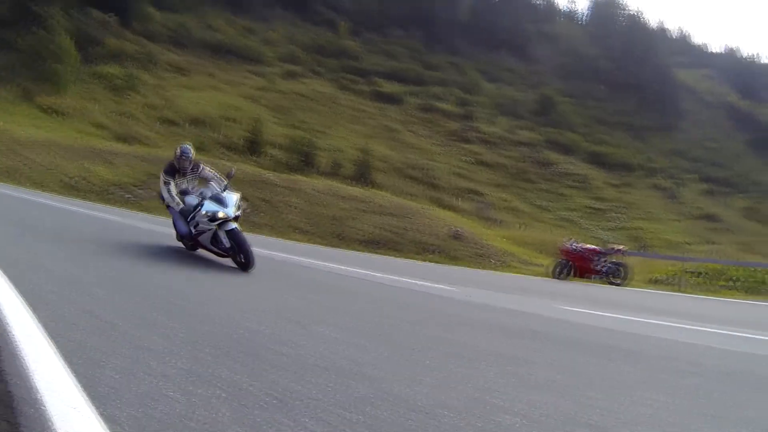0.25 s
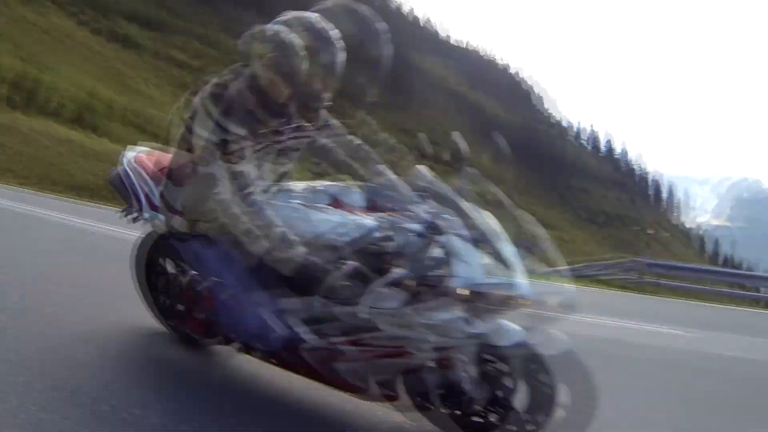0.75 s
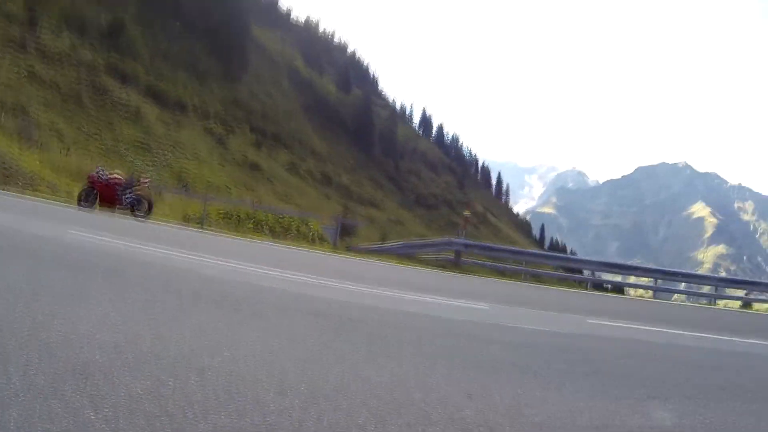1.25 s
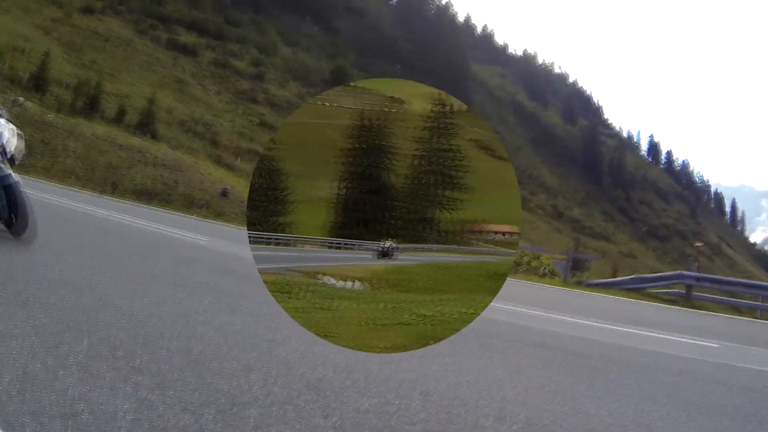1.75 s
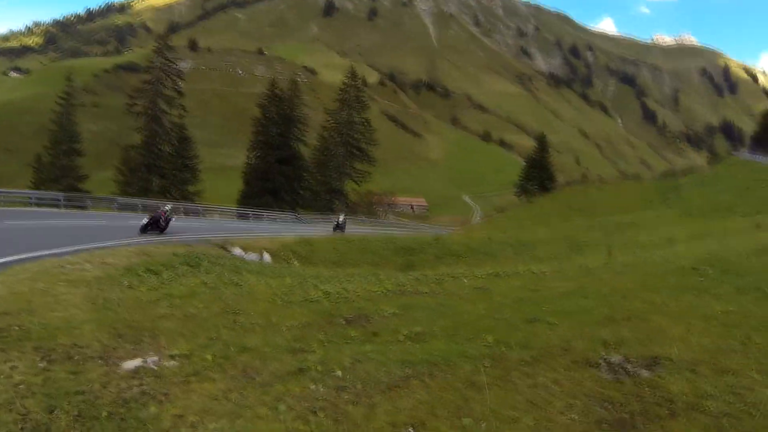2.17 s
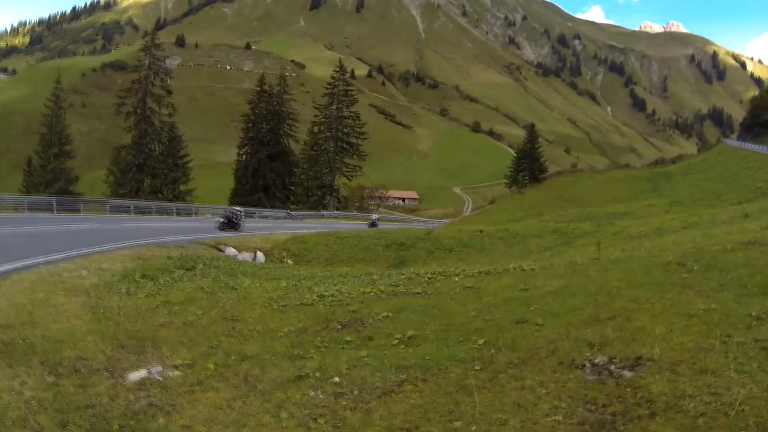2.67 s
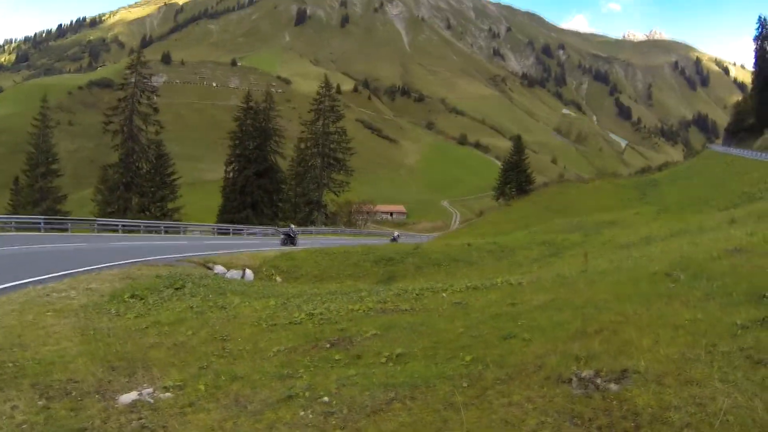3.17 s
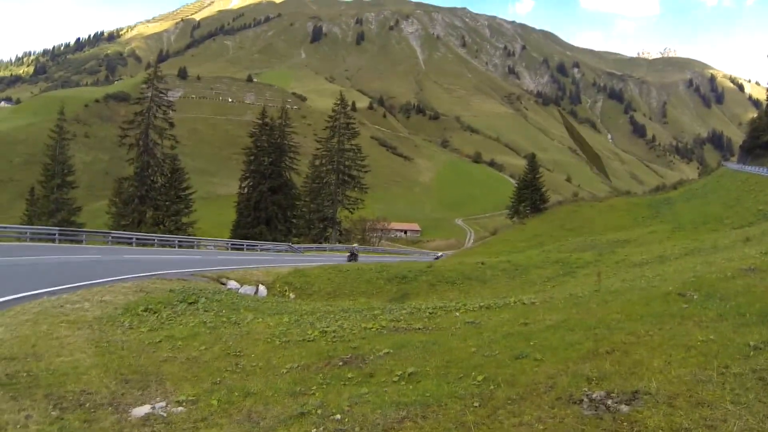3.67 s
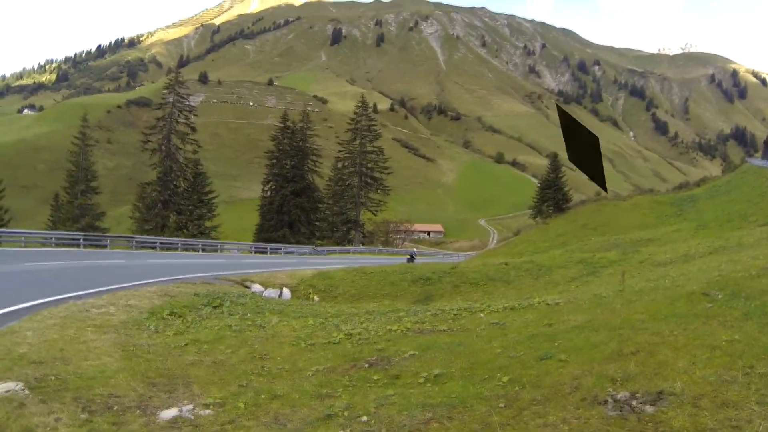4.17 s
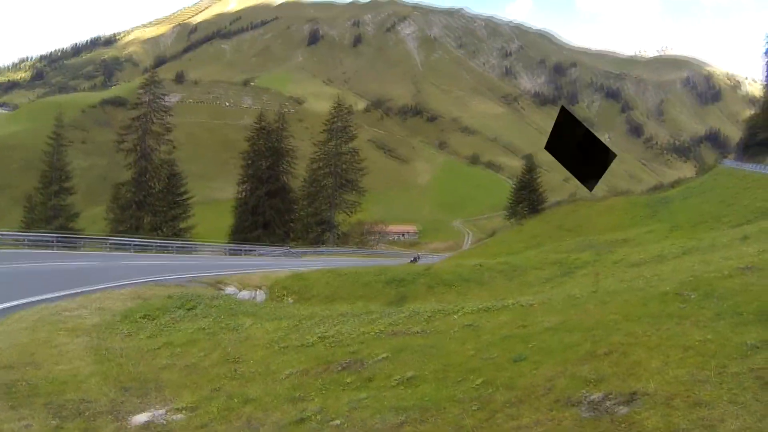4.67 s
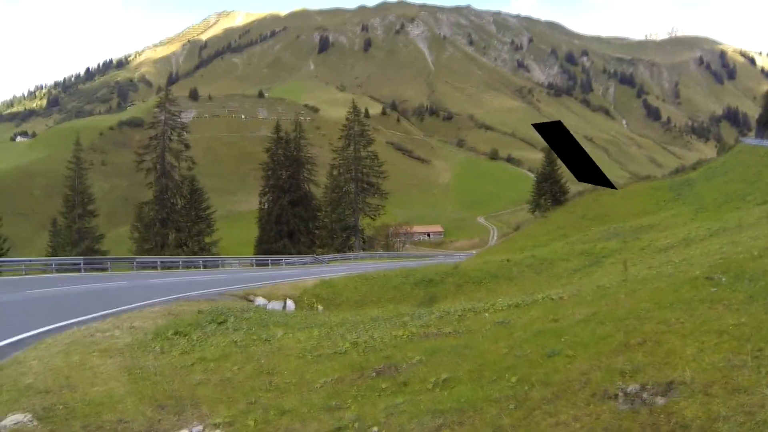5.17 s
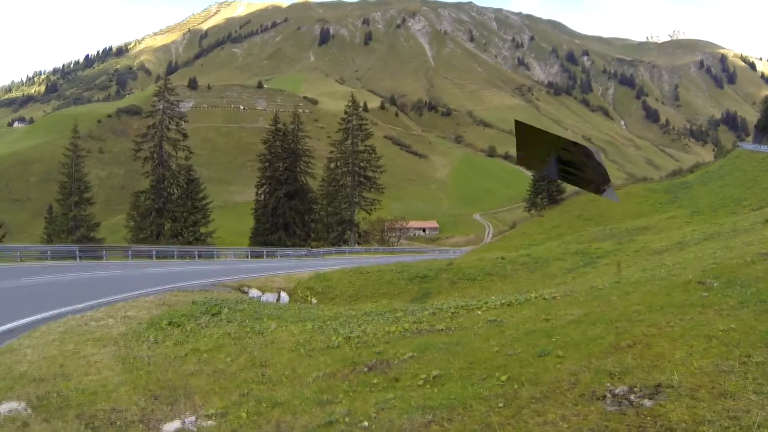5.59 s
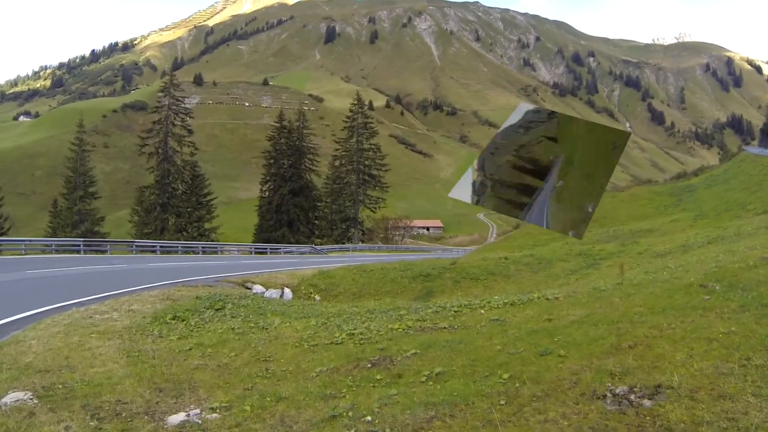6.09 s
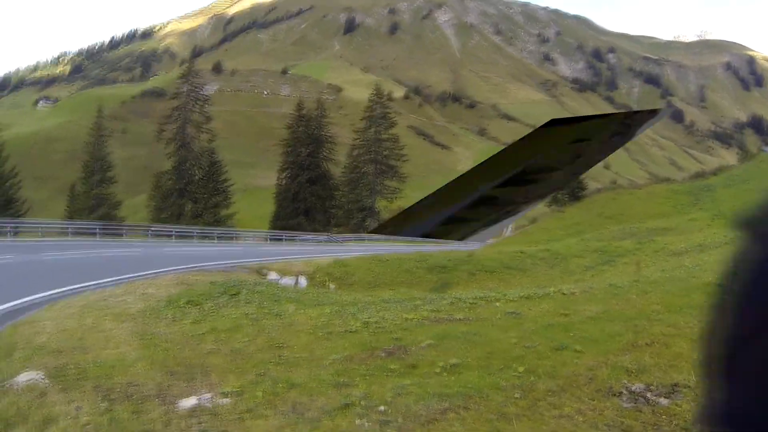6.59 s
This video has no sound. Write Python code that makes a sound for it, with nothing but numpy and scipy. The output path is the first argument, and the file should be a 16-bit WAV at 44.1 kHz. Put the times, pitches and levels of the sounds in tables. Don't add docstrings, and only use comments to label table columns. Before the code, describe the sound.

Outdoor mountain road, microphone muffled inside a small hard case. Low wind buffets throughout. A throbbing motorcycle passes within the first second, with tyre and intake roar; after a cut, a smoother engine climbs in pitch and fades. Then handling dominates: sharp plastic snaps, dull knocks, short scraping rubs and a squeaky rasp, over a barely audible idling engine.

```python
import sys
import numpy as np
from scipy import signal
from scipy.fft import rfft, irfft
from scipy.io import wavfile
from scipy.ndimage import uniform_filter1d

SR = 44100
rng = np.random.default_rng(int(sys.argv[2]) if len(sys.argv) > 2 else 0)


def convert_level_to_amplitude(level_db):
    exponent = np.asarray(level_db, float) / 20
    return 10 ** exponent


def transcribe(signal):
    frames = np.atleast_2d(signal).T
    limited = np.clip(frames, -1, 1)
    pcm = np.round(limited * 32767).astype(np.int16)
    wavfile.write(sys.argv[1], SR, pcm)


N = 301644
T = np.arange(N) / SR
SCENE_CHANGE_S = 1.967


def evened(x):
    return x / np.sqrt(np.mean(x ** 2) + 1e-20)


def add(mix, start_s, sound):
    part = mix[round(start_s * SR):][:len(sound)]
    part += sound[:len(part)]


def columns(rows):
    s, *rest = np.transpose(rows)
    t = np.arange(s[0], s[-1], 1 / SR)
    return [t] + [np.interp(t, s, column) for column in rest]


def coloured(points):
    f, db = np.transpose(points)
    hz = np.fft.rfftfreq(N, 1 / SR)
    gain = convert_level_to_amplitude(np.interp(np.log(hz + 1), np.log(f + 1), db, -80, -80))
    return evened(irfft(rfft(rng.standard_normal(N)) * gain, N))


def wander(size, seconds):
    span = round(seconds * SR)
    once = uniform_filter1d(rng.standard_normal(size), span)
    return evened(uniform_filter1d(once, span))


def arch(t, top, ends_db):
    share = (t - t[0]) / (t[-1] - t[0])
    return np.interp(share, [0, np.clip(top, 0, 1), 1], [ends_db[0], 0, ends_db[1]])


def resonate(x, hz, width):
    turn = np.exp(2j * np.pi * np.cumsum(hz * np.ones(len(x))) / SR)
    r = np.exp(-np.pi * width / SR)
    return (turn * signal.lfilter([(1 - r) ** 2], [1, -2 * r, r * r], x / turn)).real


# frequency in Hz, width in Hz, level in dB.
SHELL_MODES = [(382, 950, -10.5), (727, 335, -5), (1280, 176, 8), (1475, 746, 9.5), (1905, 350, -4.5),
               (2260, 2300, -6), (2920, 760, -5.5), (3424, 1160, -7.5), (4950, 1860, -25),
               (6364, 1090, -27.5), (7360, 4000, -34.5), (11100, 10000, -41)]
MODE_SPLITS_HZ = 1020, 2300, 4400


def shell(x, bright_db, sheen_db, panel_hz=1500, panel_db=0, groan_db=-15):
    hz = abs(np.fft.fftfreq(4096, 1 / SR))
    power = sum(convert_level_to_amplitude(2 * db) / (1 + (2 * (hz - f) / w) ** 2) ** 4 for f, w, db in SHELL_MODES)
    power *= convert_level_to_amplitude(2 * panel_db * np.exp(-(np.log((hz + 1) / panel_hz) / 0.15) ** 2))
    below = [0] + [1 / (1 + (hz / edge) ** 16) for edge in MODE_SPLITS_HZ] + [1]
    out = 0
    for lo, hi, db in zip(below, below[1:], (groan_db, 0, bright_db, sheen_db)):
        log_gain = np.log(power * abs(hi - lo) + 1e-10) / 2
        taps = np.fft.ifft(np.exp(np.conj(signal.hilbert(log_gain)))).real[:1024]
        out = out + convert_level_to_amplitude(db) * signal.oaconvolve(x, taps / np.linalg.norm(taps))[:len(x)]
    return out


# time in seconds, strength in dB.
BREEZE = [(0, -38.5), (.5, -22.5), (1.16, -23), (1.27, -28), (1.85, -24.5), (2.7, -29), (2.95, -28.5),
          (3.29, -27.5), (3.41, -35.5), (3.56, -26), (3.89, -31.5), (4.08, -29), (4.4, -34.5),
          (4.82, -39.5), (5.28, -27.5), (5.41, -38.5), (6.29, -42), (6.84, -29)]
# time in seconds, strength in dB, half length in seconds.
GUSTS = [(.05, -18.5, 0.024), (0.317, -25, 0.07), (0.436, -16.5, 0.039), (1.372, -15, .05),
         (1.728, -16, 0.045), (4.22, -15, 0.063), (4.48, -18.5, 0.18), (4.901, -21, 0.052),
         (6.46, -32.5, 0.07), (6.658, -26, 0.026), (6.767, -14, 0.053)]
# frequency in Hz, level in dB per Hz.
RUMBLE_SPECTRUM = [(8, 14), (18, 6.5), (35, -1.5), (60, -16.5), (90, -17), (150, -70)]
# frequency in Hz, level in dB per Hz.
FLUTTER_SPECTRUM = [(30, 9.5), (60, 2), (90, -5), (130, -7), (250, -19.5), (500, -31), (900, -33),
                    (1500, -55)]


def wind():
    push = convert_level_to_amplitude(np.interp(T, *np.transpose(BREEZE)))
    push = push + sum(convert_level_to_amplitude(db) * np.exp(-((T - s) / half) ** 2) for s, db, half in GUSTS)
    slow_db = uniform_filter1d(20 * np.log10(push), round(0.23 * SR))
    swings = push * convert_level_to_amplitude(2.12 * wander(N, 0.01324) + 2.0)
    offset_db = np.where(T < SCENE_CHANGE_S, -18, -21)
    flutter_db = 0.76 * slow_db + offset_db + 4.0 * wander(N, 0.0098)
    return swings * coloured(RUMBLE_SPECTRUM) + convert_level_to_amplitude(flutter_db) * coloured(FLUTTER_SPECTRUM)


def exhaust(hz, orders, wobble, flutter_db, cycle_s=0.078):
    turns = np.cumsum(hz * (1 + wobble * wander(len(hz), cycle_s))) / SR
    out = 0
    for order, db in orders:
        level = convert_level_to_amplitude(db + flutter_db * wander(len(hz), cycle_s))
        out = out + level * np.sqrt(2) * np.sin(2 * np.pi * (order * turns + rng.random()))
    return out, turns


# time in seconds, firings per second, drone level in dB.
IDLE = [
    (3.1, 28.7, -57),
    (3.9, 27.4, -47.5),
    (4.5, 31, -57),
    (5.4, 31, -61),
    (6.3, 30.4, -62.5),
    (6.84, 26, -44),
]


def idling_twin():
    t, rate, drone_db = columns(IDLE)
    drone, turns = exhaust(rate, [(5, 0)], wobble=.008, flutter_db=2.2)
    puffs = np.exp(-(turns % 1) / 0.15) * rng.standard_normal(len(t))
    return t[0], convert_level_to_amplitude(drone_db) * drone + convert_level_to_amplitude(-66.5) * shell(evened(puffs), -8.5, -26)


# time in seconds, level in dB.
ROARS = [
    [(0, -52.5), (.26, -49.5), (.5, -46), (.77, -41.5), (1.0, -44.5), (1.2, -48), (1.55, -49),
     (1.965, -46.5)],
    [(1.97, -55), (2.85, -54.5), (3.2, -60.5), (3.9, -67.5), (4.4, -60.5), (5.3, -64.5), (6.3, -70.5),
     (6.84, -44.5)],
]
# brightness in dB, sheen in dB.
ROAR_COLOURS = [(-9, -13.5), (-14, -19)]


def roar(rows, colour):
    t, level_db = columns(rows)
    closeness_db = 0.47 * (level_db - level_db.mean())
    bright_db, sheen_db = np.add.outer(colour, closeness_db)
    noise = shell(rng.standard_normal(len(t)), bright_db, sheen_db)
    return t[0], convert_level_to_amplitude(level_db + 0.97 * wander(len(t), 0.024)) * noise


# start in seconds, end in seconds, first Hz, last Hz, peak level in dB.
WHINES = [
    (0.96, 1.4, 1460, 1760, -48.5),
    (1.6, 1.965, 6100, 6450, -57.5),
    (1.9, 1.965, 3600, 3890, -52),
]


def whine(start, end, first_hz, last_hz, peak_db):
    t, hz = columns([(start, first_hz), (end, last_hz)])
    level_db = peak_db + arch(t, 0.75, (-6, -12))
    return start, convert_level_to_amplitude(level_db) * evened(resonate(rng.standard_normal(len(t)), hz, 0.12 * last_hz))


# time in seconds, firing rate in Hz, level in dB.
NEAR = [
    (0, 110.1, -45),
    (.3, 109.1, -57.5),
    (.7, 104.5, -41),
    (.85, 109.7, -31),
    (1.07, 108.6, -31),
    (1.2, 110.2, -40),
    (1.6, 114.2, -39.5),
    (1.83, 118.8, -37),
    (1.965, 112.7, -38),
]
# multiple of the firing rate, level in dB.
NEAR_ORDERS = [(1, -1.5), (1.5, -25.5), (3, -25), (4, -27.5), (5, -26.5), (6, -37), (7, -31)]


def near_bikes():
    t, hz, level_db = columns(NEAR)
    second_db = -49.5 - 12 * np.clip(1 - t / 0.29, 0, 1)
    out = convert_level_to_amplitude(level_db) * exhaust(hz, NEAR_ORDERS, wobble=.018, flutter_db=2.5, cycle_s=.015)[0]
    second = exhaust(hz, [(2, 0)], wobble=.012, flutter_db=1.5, cycle_s=.02)[0]
    growl = evened(resonate(rng.standard_normal(len(t)), 2 * hz, 130))
    follower = exhaust(178.5 + 0 * t, [(1, 0)], wobble=0.01371, flutter_db=3.5)[0]
    follower = convert_level_to_amplitude(-57.5 + 6 * t) * follower
    throb = convert_level_to_amplitude(4.5 * np.cos(2 * np.pi * 15.6 * (t - .872)))
    return t[0], follower + throb * (out + convert_level_to_amplitude(second_db) * second) + convert_level_to_amplitude(second_db - 4.0) * growl


# time in seconds, firing rate in Hz, level in dB.
AWAY = [
    (1.97, 117.5, -45),
    (2.09, 120.7, -42),
    (2.314, 129.2, -40),
    (2.5, 135.1, -41),
    (2.65, 138.1, -41.5),
    (2.85, 140.5, -39.5),
    (2.98, 141.8, -38.5),
    (3.1, 146, -48),
    (3.3, 143, -66),
]
# multiple of the firing rate, level in dB.
AWAY_ORDERS = [(2, -10), (3, -21), (4, -26), (5, -36)]


def leaving_bike():
    t, hz, level_db = columns(AWAY)
    gear_db = np.interp(t, [2.10, 2.22, 2.64, 2.76], [-70, -54.5, -54.5, -70])
    tones, turns = exhaust(hz, AWAY_ORDERS, wobble=0.0042, flutter_db=0.3, cycle_s=0.083)
    shut_db = np.interp(t, [2.79, 2.9], [0, -16])
    first = np.sqrt(2) * np.sin(2 * np.pi * turns)
    mesh = 2 * np.pi * 13 * turns
    gear_level = convert_level_to_amplitude(gear_db + 1.6 * wander(len(t), .015))
    gear = gear_level * np.sqrt(2) * np.sin(mesh + .5 * wander(len(t), .006))
    octave_db = np.interp(t, [2.45, 2.7, 3.3], [-90, -71, -76])
    octave = convert_level_to_amplitude(octave_db + 4.1 * wander(len(t), .02)) * np.sin(2 * mesh)
    return t[0], convert_level_to_amplitude(level_db) * (first + convert_level_to_amplitude(shut_db) * tones) + gear + octave


# start in seconds, length in seconds, place of the peak from 0 to 1, pressure in dB, fade in dB.
PALM_RUBS = [(0.302, 0.053, 0.19, -40.5, -1), (0.405, 0.087, 0.3, -45, -7), (0.519, 0.042, 1, -36.5, -11),
             (.6, 0.057, 0.79, -36.5, -29), (2.03, 0.044, 0.48, -46.5, -18),
             (4.141, .079, 0.7, -29.5, -4.5)]
TIP_RUBS = [(1.345, 0.059, .4, -31, -10), (1.459, 0.058, 0.38, -36.5, -13), (1.59, .03, 0.35, -34.5, -7.5)]
SLIDES = [(2.891, .15, 0.051, -37.5, -5), (3.035, .11, 0.084, -47, -5), (4.165, .056, 0.47, -28.5, -8),
          (4.384, .105, .36, -42, 1), (4.893, 0.021, .3, -38.5, -8)]
PRESSES = [(4.244, .056, 0.26, -23, -32), (4.316, 0.061, 0.26, -40, -9), (4.486, .082, 0.36, -34, -6.5),
           (4.563, .217, .13, -33.5, -25.5), (4.838, 0.055, 0.86, -34, -15),
           (4.916, 0.072, 0.44, -41.5, -9), (5.15, 0.057, 0.47, -37.5, -27), (5.245, 0.18, 0.018, -56, 2),
           (6.47, .03, 0.41, -39, 3), (6.492, 0.092, .08, -33, -10.5), (6.581, 0.071, 0.51, -36, -12),
           (6.7, 0.12, .3, -51, 6), (6.774, 0.061, 0.055, -32.5, -12), (6.818, 0.015, .1, -30, -26)]
RASPS = [(4.97, 0.091, 0.34, -23, -14.5), (5.037, 0.077, 0.33, -24, -23), (5.124, 0.035, 0.47, -21.5, -28),
         (6.395, .06, 0.53, -27, -6)]
SQUEAKS = [(6.355, .035, .06, -47, 0), (6.39, 0.07, 0.85, -15.5, -24.5)]
DRAGS = [(3.557, .105, .03, -44, .8)]
# favoured panel mode in Hz, its gain in dB, groan in dB,
# brightness in dB, sheen in dB, first touch in dB.
GRIPS = [
    (1300, 12.5, -1.5, -11.5, -15.5, -14),
    (2855, 9.5, -12, -8.5, -16.5, -11),
    (1970, 5, -10, -9.5, -12, -12),
    (1700, 5, -11, -15, -18, -9),
    (2100, 12.5, -18.5, -11.5, -24.5, -20),
    (6400, 8, -27, -21.5, -23, -15),
    (770, 3, -4, -7, -14.5, 1),
]


def rub(start, length, top, pressure_db, fade_db, grip):
    t = np.arange(0, length, 1 / SR)
    panel_hz, panel_db, groan_db, bright_db, sheen_db, touch_db = grip
    grains = rng.standard_normal(SR // 3) * convert_level_to_amplitude(2.4 * wander(SR // 3, .002))
    slips = evened(grains[:len(t)]) * signal.windows.tukey(len(t), min(.005 * SR / len(t), 1))
    level = convert_level_to_amplitude(pressure_db + arch(t, top, (touch_db, fade_db)))
    return start, level * shell(slips, bright_db, sheen_db, panel_hz, panel_db, groan_db)


# time in seconds, peak in dB, ring in Hz, brightness in dB.
SNAPS = [(0.365, -26, 1210, -31), (2.7816, -11, 1590, -24.5), (3.5544, -11.5, 1280, -18.5),
         (4.1383, -23.5, 1340, -6.5), (4.1492, -19.5, 1340, -10.5), (4.1912, -8, 1340, -15),
         (4.208, -26, 1200, -2), (4.242, -14.5, 1280, -42), (4.259, -14.5, 1630, -16),
         (4.2692, -13.5, 1314, -28), (4.321, -25.5, 1250, -24), (4.347, -17, 1630, -36),
         (4.5946, -15.5, 1520, -32), (4.829, -17, 1370, -10), (4.873, -30.5, 1530, -5),
         (5.1364, -19, 1594, -37), (5.236, -12, 1685, -16), (6.3467, -19, 1470, -9.5),
         (6.392, -15.5, 1310, -34), (6.6076, -15, 1290, -27), (6.69, -26, 1410, -23),
         (6.7277, -20, 1460, -32), (6.768, -12.5, 1250, 1.5), (6.812, -2, 1354, -12.5),
         (6.8159, -12, 1350, -8)]


def snap(s, peak_db, ring_hz, bright_db):
    t = np.arange(1500) / SR
    ring = np.sin(2 * np.pi * ring_hz * t) * convert_level_to_amplitude(-60 * t / 0.014) * (1 - np.exp(-t / 0.00016))
    panel = convert_level_to_amplitude(-25 - 60 * t / 0.034) * np.sin(2 * np.pi * 716 * t)
    tick = uniform_filter1d(rng.standard_normal(len(t)), size=3) * convert_level_to_amplitude(-60 * t / .0025)
    splash = shell(1.8 * tick / np.linalg.norm(tick), bright_db + 7, bright_db - 1.5, 2070, 1.1)
    return s, convert_level_to_amplitude(peak_db) * (0.93 * ring + panel + splash)


# time in seconds, peak in dB, swing in Hz,
# decay by 60 dB in seconds, time the first fast swing takes in seconds.
BUMPS = [(0.252, -7.5, 35, 0.25, 0.0077), (2.04, -10.5, 54, 0.11, 0.0046), (2.892, -11.5, 50, 0.18, 0.0053),
         (3.551, -7, 46.6, 0.18, 0.0025), (4.14, -3.5, 10, .3, 0.018), (4.185, -2, 25, 0.4, 0.003),
         (4.252, -1.5, 13, .35, 0.03), (4.891, -10, 28, 0.3, 0.05), (6.607, -1.5, 9, 0.28, 0.019),
         (4.244, -7.5, 31, 0.084, 0.0034), (4.341, -20.5, 69, 0.12, 0.0055),
         (4.591, -17, 60, 0.061, 0.0021), (4.827, -29.5, 92, 0.21, 0.002), (5.124, -21.5, 54, 0.18, 0.0019),
         (5.237, -33, 47, 0.12, 0.0015), (6.45, -12, 20, 0.12, 0.012), (6.81, -12.5, 74, 0.026, 0.0022)]


def bump(s, peak_db, swing_hz, t60, quick_s):
    t = np.arange(SR // 3) / SR
    turns = swing_hz * t + 0.793 * (1 - np.exp(-t / quick_s))
    onset = 1 - np.exp(-t / min(quick_s, 0.0045))
    return s, -convert_level_to_amplitude(peak_db - 60 * t / t60) * np.sin(2 * np.pi * turns) * onset


def scene():
    out = wind()
    for part in (idling_twin, near_bikes, leaving_bike):
        add(out, *part())
    for rows, colour in zip(ROARS, ROAR_COLOURS):
        add(out, *roar(rows, colour))
    strokes = (PALM_RUBS, TIP_RUBS, SLIDES, PRESSES, RASPS, SQUEAKS, DRAGS)
    for rows, grip in zip(strokes, GRIPS):
        for row in rows:
            add(out, *rub(*row, grip))
    for make, rows in ((whine, WHINES), (snap, SNAPS), (bump, BUMPS)):
        for row in rows:
            add(out, *make(*row))
    return out[None]


def roll_off(x):
    return signal.sosfilt(signal.butter(12, 15340, fs=SR, output="sos"), x)


# frequency in Hz, width in Hz, level in dB.
TONE = (7680, 45, -85)


def record(dry):
    tone_hz, width, db = TONE
    tone = convert_level_to_amplitude(db) * evened(resonate(rng.standard_normal(N), tone_hz, width))
    hiss = convert_level_to_amplitude(-63.5) * coloured([(200, 8.0), (4000, -6), (9000, -17), (12500, -18.0), (15100, -20)])
    limited = 1.4 * np.tanh((dry + tone + hiss) / 1.4)
    edge = signal.firwin(255, 15330, window=("kaiser", 5), fs=SR)
    return roll_off(signal.oaconvolve(limited, edge[None], "same"))


dry = scene()
out = record(dry)
transcribe(out)
```